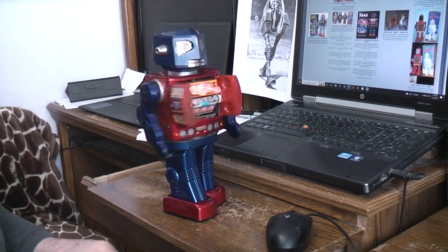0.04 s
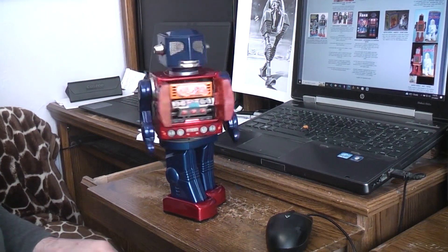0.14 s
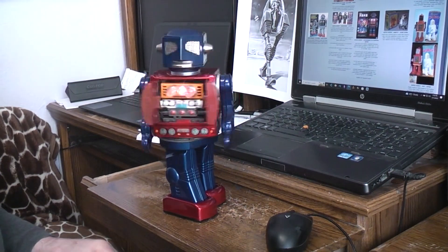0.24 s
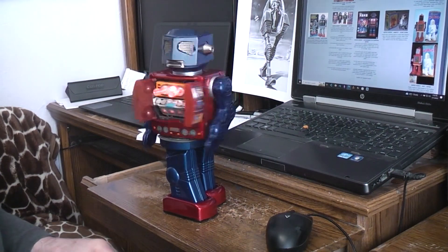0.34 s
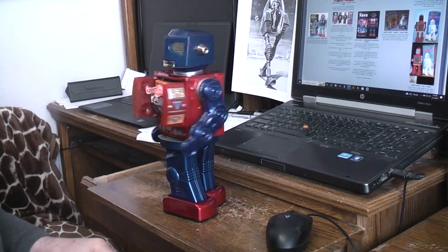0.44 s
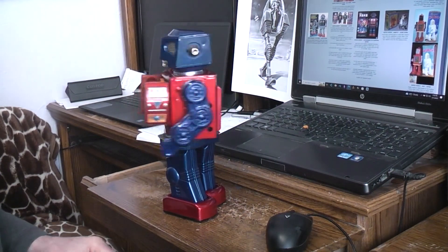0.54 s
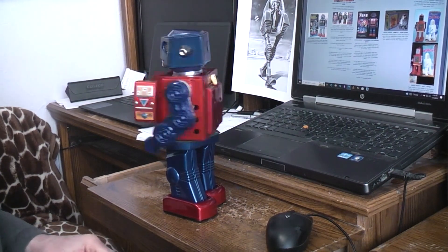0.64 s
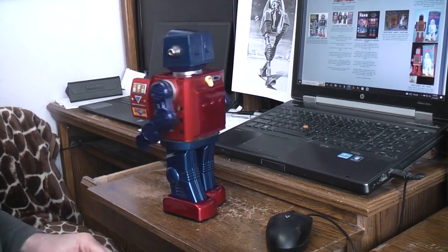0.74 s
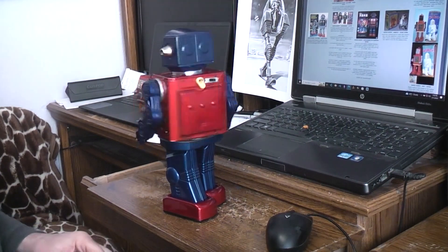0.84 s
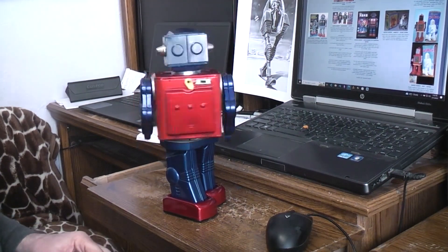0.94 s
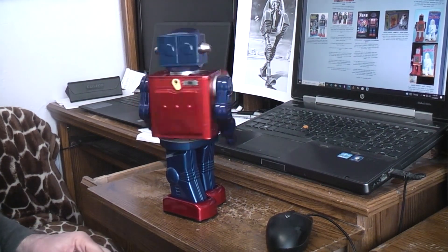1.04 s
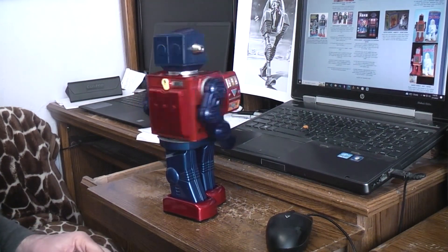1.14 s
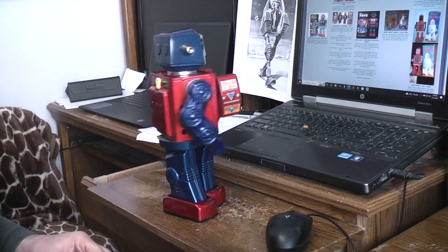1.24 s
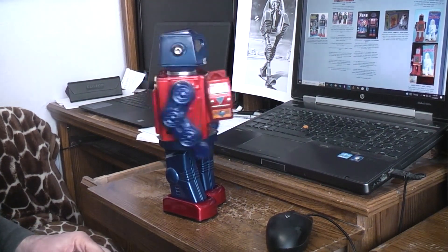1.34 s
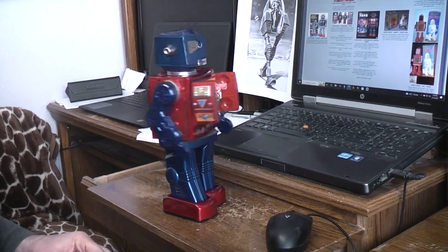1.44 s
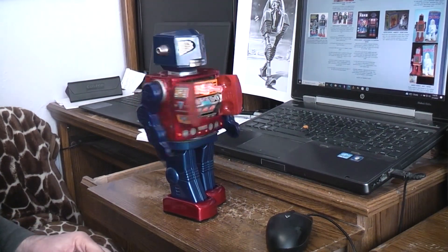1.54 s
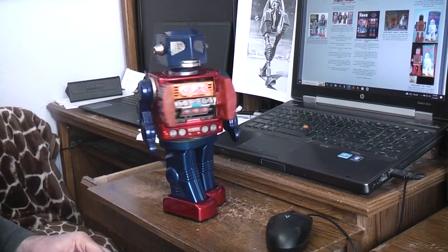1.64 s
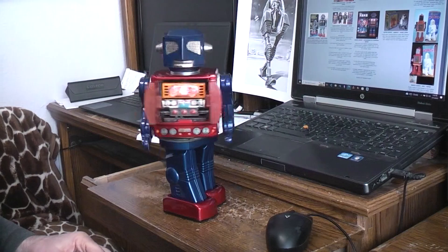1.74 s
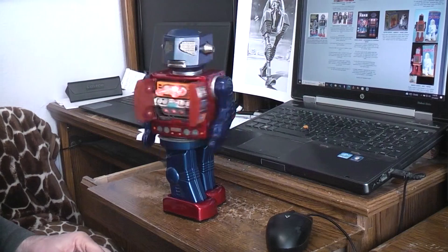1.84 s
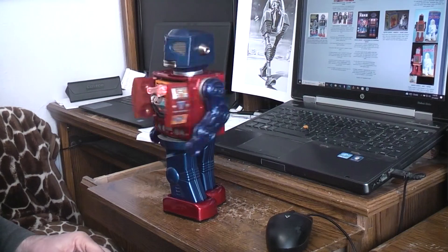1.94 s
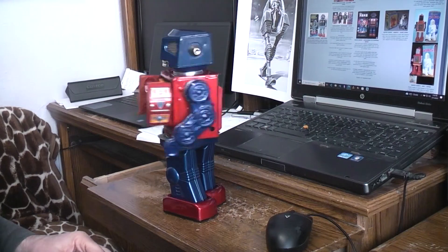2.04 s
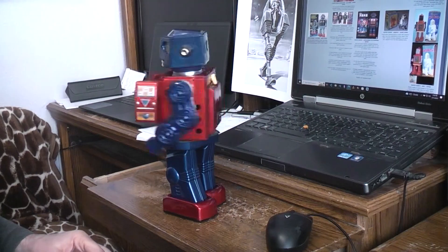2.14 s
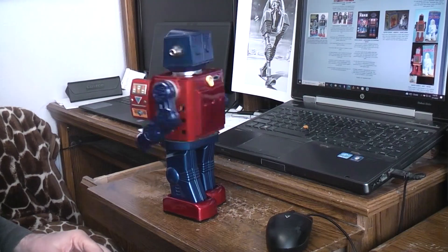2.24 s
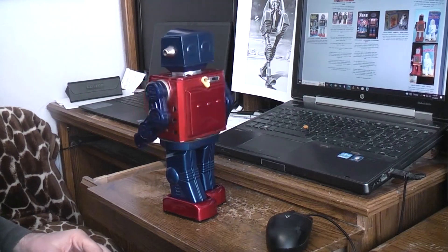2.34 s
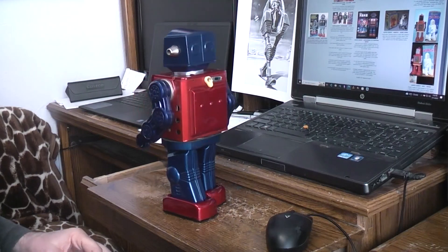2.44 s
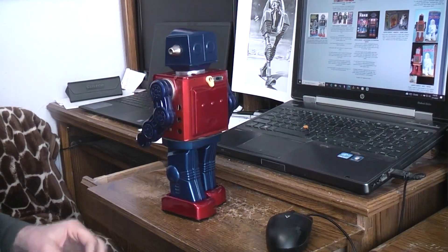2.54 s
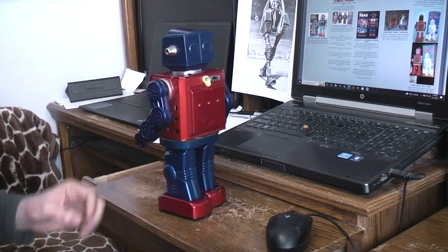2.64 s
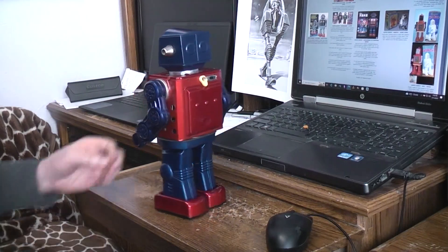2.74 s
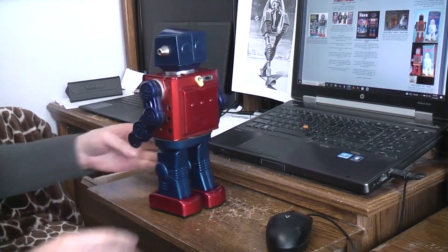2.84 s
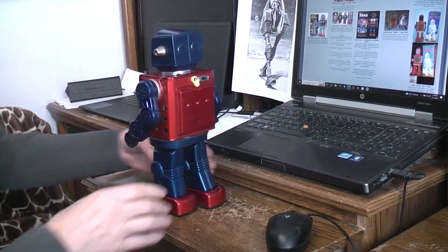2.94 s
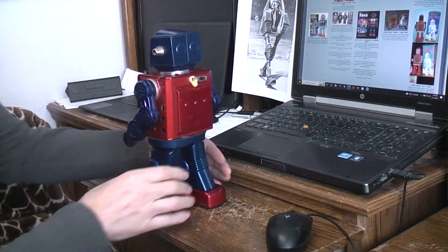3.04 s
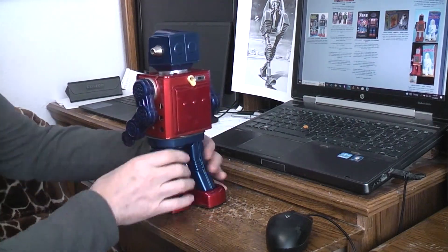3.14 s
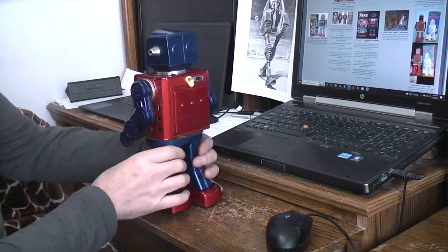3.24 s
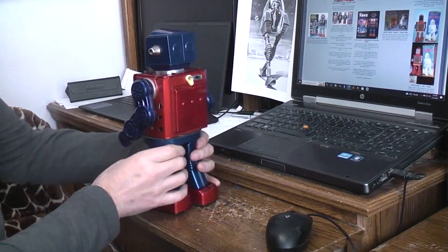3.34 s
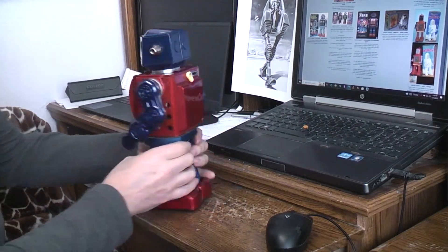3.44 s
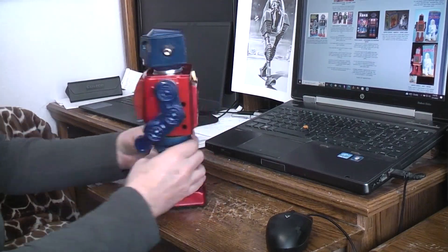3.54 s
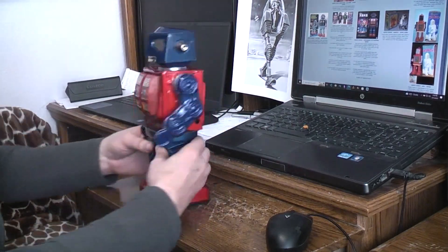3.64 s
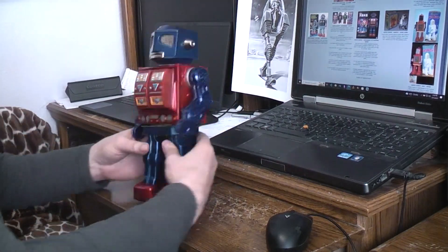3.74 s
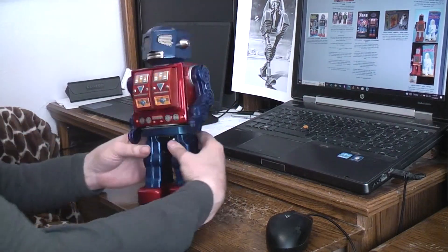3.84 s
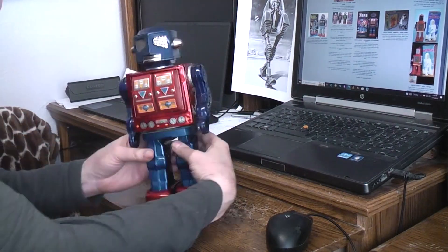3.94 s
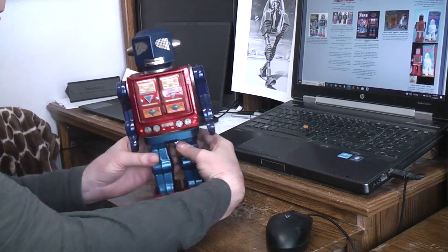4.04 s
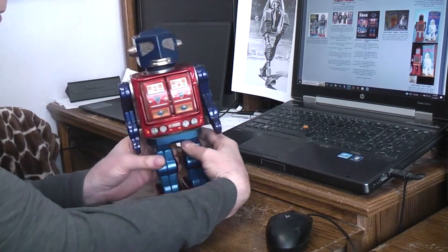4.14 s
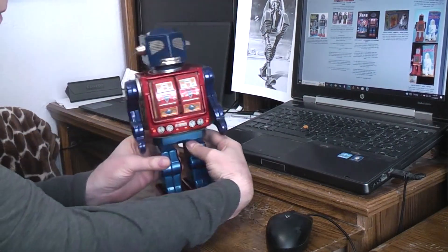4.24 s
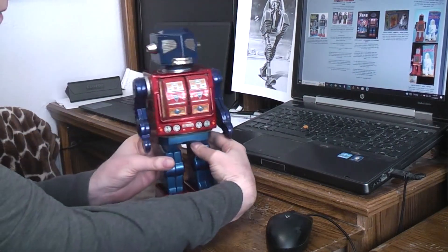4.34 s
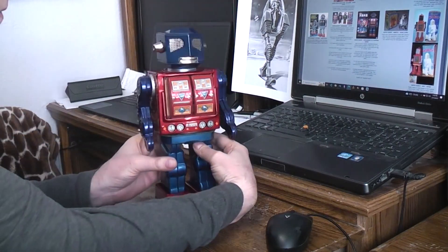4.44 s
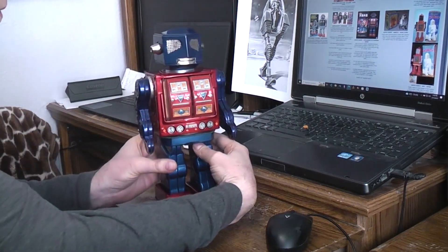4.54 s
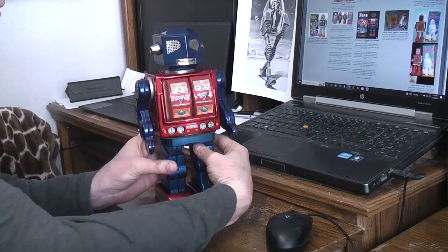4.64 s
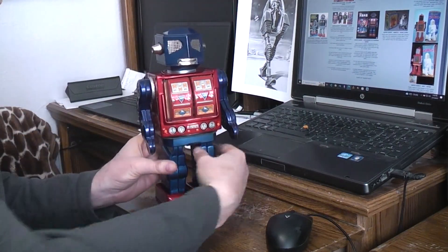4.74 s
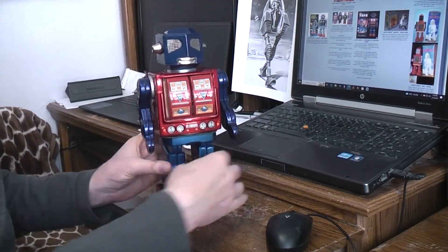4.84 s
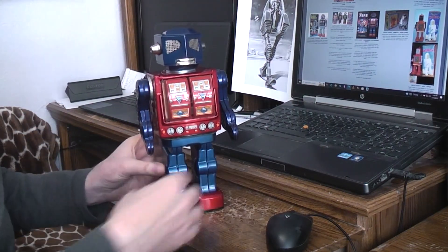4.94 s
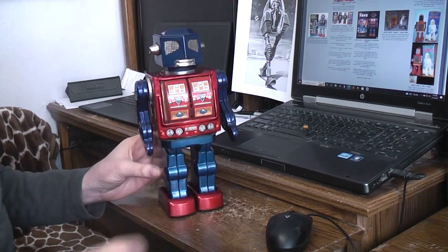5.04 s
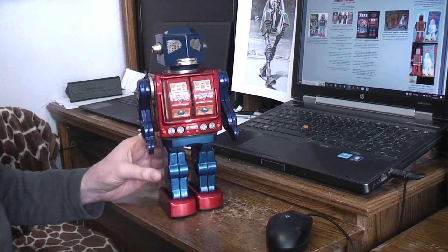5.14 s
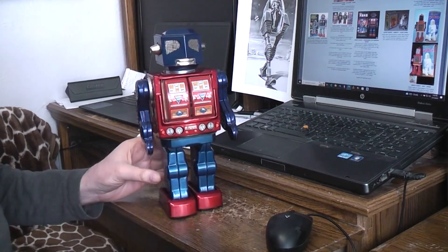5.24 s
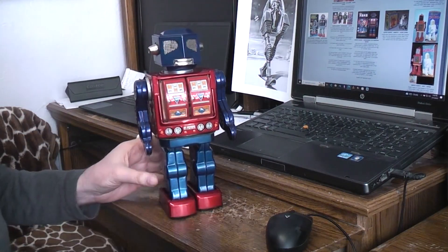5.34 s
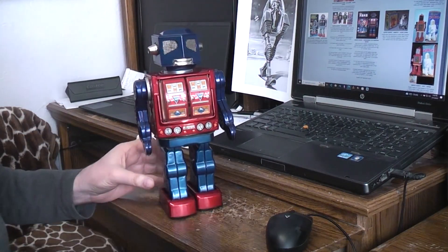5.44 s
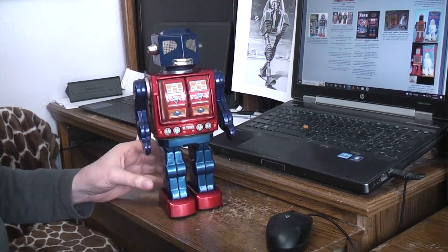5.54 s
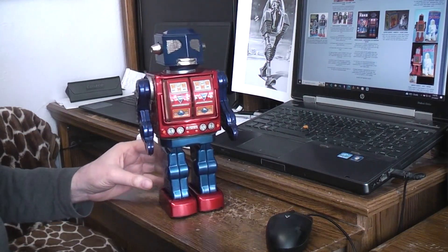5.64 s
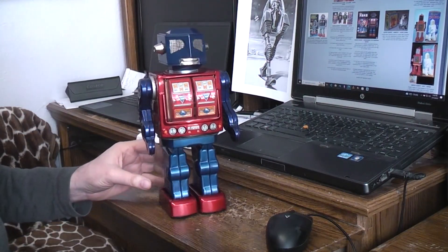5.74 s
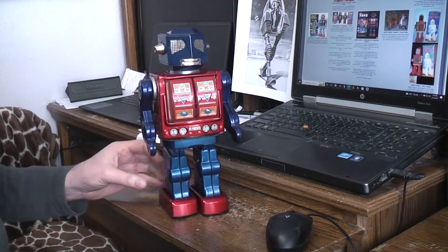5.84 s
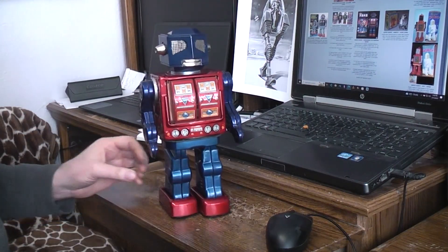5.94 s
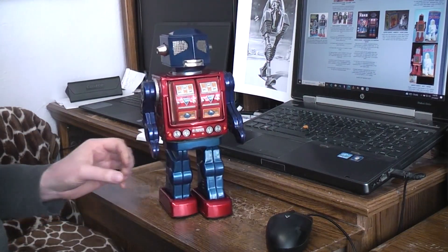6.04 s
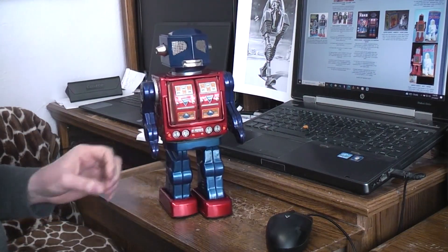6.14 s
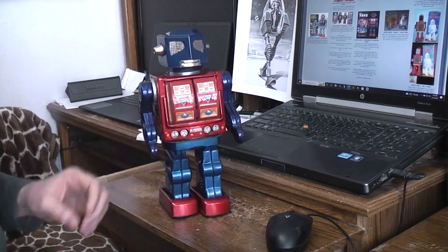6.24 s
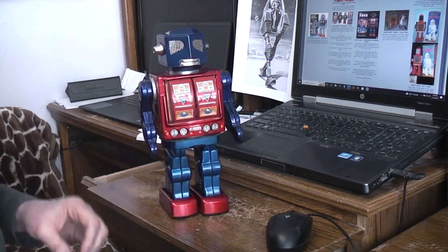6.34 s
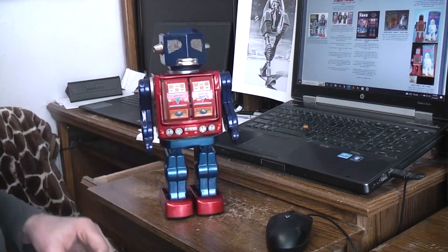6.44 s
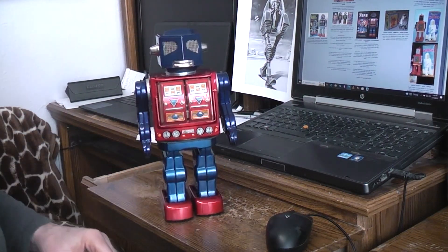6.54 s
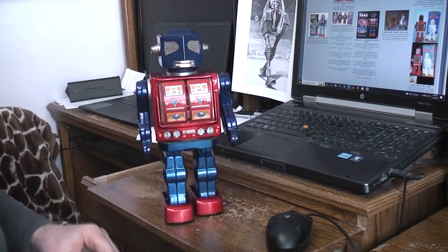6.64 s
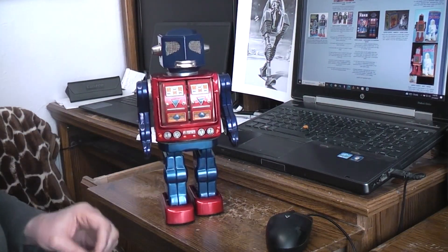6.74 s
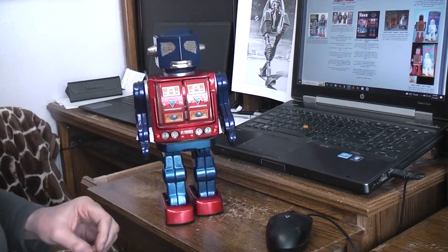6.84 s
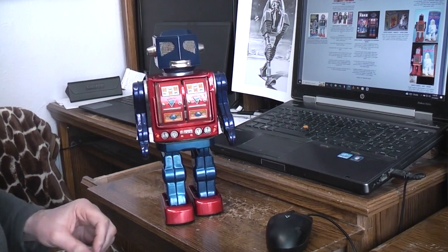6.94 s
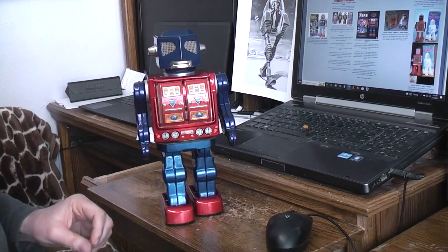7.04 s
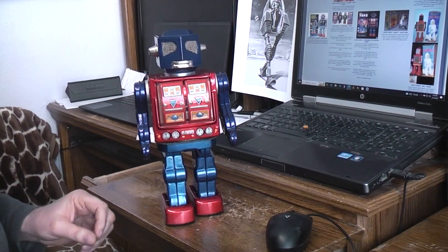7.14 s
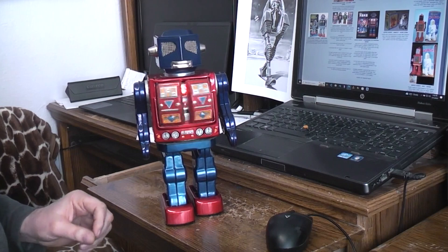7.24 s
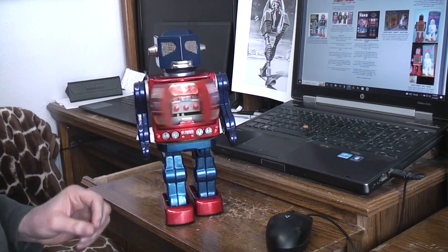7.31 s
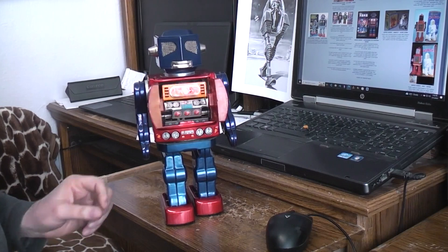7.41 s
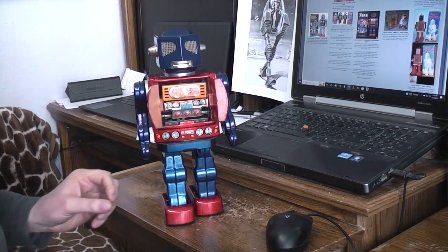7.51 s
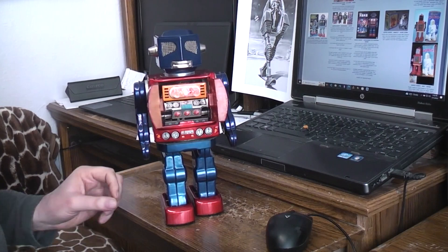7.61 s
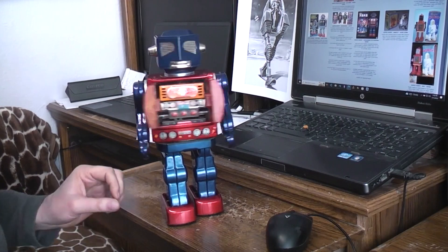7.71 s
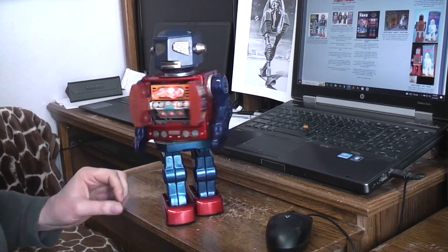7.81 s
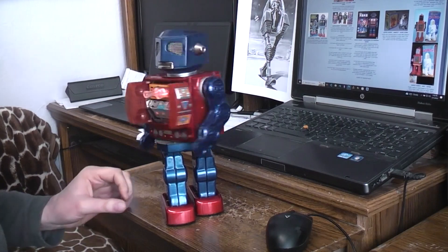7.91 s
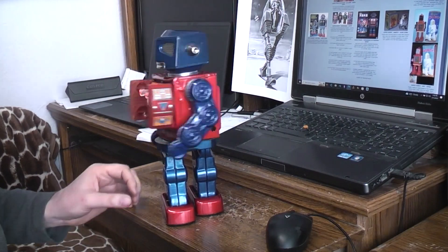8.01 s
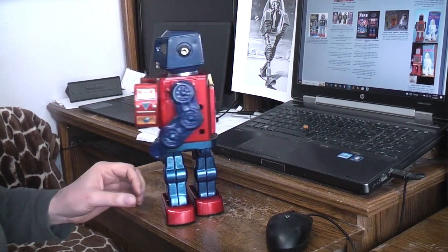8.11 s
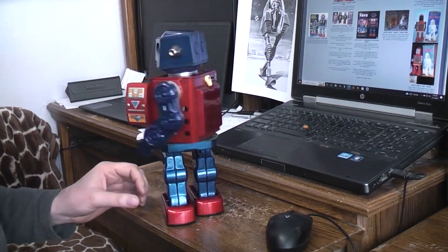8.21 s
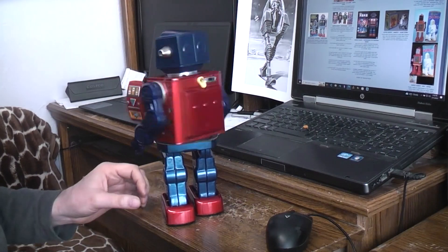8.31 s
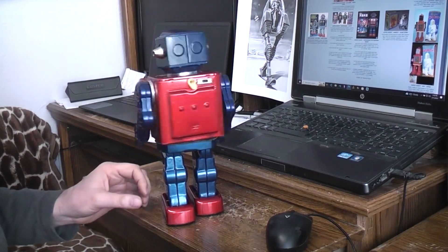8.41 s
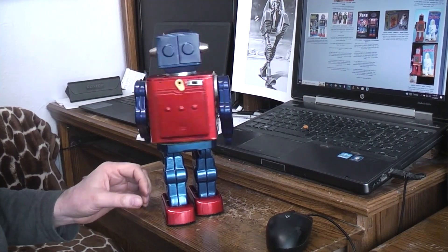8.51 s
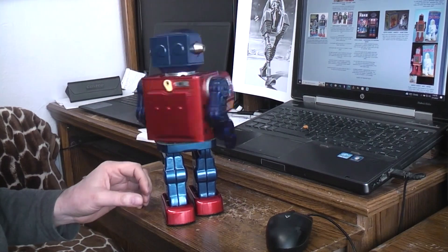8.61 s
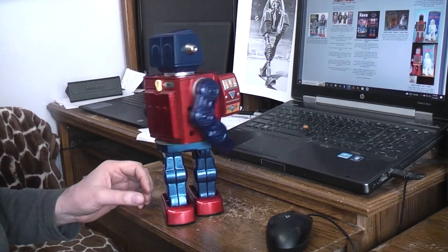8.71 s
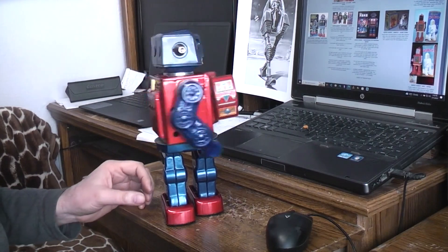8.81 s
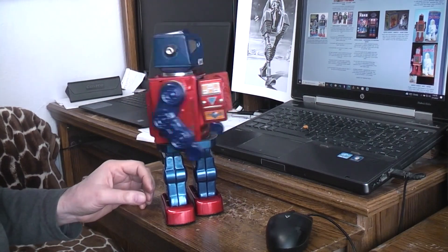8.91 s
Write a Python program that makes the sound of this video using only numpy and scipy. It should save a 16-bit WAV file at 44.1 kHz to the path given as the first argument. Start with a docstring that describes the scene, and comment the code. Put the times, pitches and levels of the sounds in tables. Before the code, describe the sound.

A tin toy robot clacks rapidly, drops to a buzzing motor and gear chatter as it walks, then starts clacking again.

```python
"""The clacker of a tin toy robot, on a wooden desk in a small room. While the chest spins, a cam strikes
the tin thirteen times a second; each impact excites damped modes, and the room answers with echoes.
Between the two spins the robot walks, its feet knocking on the desk. Throughout, the motor hums and the
gears chatter and whine over a low rumble. An automatic gain control ducks after the loud clacks and
creeps back up when they stop."""
import sys
import numpy as np
from scipy import signal
from scipy.fft import rfft, irfft, next_fast_len
from scipy.io import wavfile

SR = 44100
rng = np.random.default_rng(int(sys.argv[2]) if len(sys.argv) > 2 else 0)


def generate_wav(sig):
    """Save sig (samples, or channels by samples) to the path in sys.argv[1] as 16-bit PCM at SR."""
    pcm = np.round(np.clip(np.atleast_2d(sig).T, -1, 1) * 32767).astype(np.int16)
    wavfile.write(sys.argv[1], SR, pcm)


N = 395577
TIME = np.arange(N) / SR
CONTACT_S = .0007   # from first contact to the impulse

def amp(db):
    return 10 ** (np.asarray(db) / 20)

def unit_rms(x):
    return x / np.sqrt(np.mean(x ** 2) + 1e-20)

def in_time(rows):
    return np.interp(TIME, *np.transpose(rows))

def at_hz(rows, hz):
    row_hz, values = np.transpose(rows)
    return np.interp(np.log(hz), np.log(row_hz), values)

def drift(rate_hz):
    """Low-passed noise: a slow random fluctuation of unit RMS."""
    r = np.exp(-80 * np.pi * rate_hz / SR)
    slow = signal.lfilter([1], [1, -2 * r, r * r], rng.standard_normal(N // 40 + 2002))[2000:]
    return np.interp(np.arange(N) / 40, np.arange(len(slow)), unit_rms(slow))

def lag(x, seconds):
    """First-order relaxation with the given time constant."""
    r = np.exp(-1 / (seconds * SR))
    return signal.lfilter([1 - r], [1, -r], x, zi=[r * x[0]])[0]

def highpass(x, order, hz):
    return signal.sosfilt(signal.butter(order, hz, "high", fs=SR, output="sos"), x)

def impulses(rows, heights):
    """A brief impact acts as an impulse: one for each row's start time."""
    out = np.full(N, 1e-18)
    out[((np.array(rows)[:, 0] + CONTACT_S) * SR).astype(int)] = heights
    return out

def ring(force, hz, t60):
    """A damped mode: a unit impulse starts a decaying sine of height 1."""
    r, w = amp(-60 / (t60 * SR)), 2 * np.pi * hz / SR
    return signal.lfilter([0, np.sin(w)], [1, -2 * r * np.cos(w), r * r], force)

def resonate(x, peaks, lift_db, swell_db):
    """Resonance reinforces narrow bands of x, each swelling and fading independently."""
    out = x.copy()
    for hz, width, db in peaks:
        r = np.exp(-np.pi * width / SR)
        poles = [1, -2 * r * np.cos(2 * np.pi * hz / SR), r * r]
        band = signal.lfilter([(1 - r * r) / 2, 0, (r * r - 1) / 2], poles, x)
        out += amp(db + lift_db + swell_db * drift(2.8)) * band
    return out

# Likeness of the two channels. Each row: frequency in Hz, left-right correlation.
COHERENCE = [(40, 0.097), (190, 0.8), (1000, 0.86), (4000, 0.76), (8000, 0.75), (14000, 0.77)]
# Stereo balance. Each row: frequency in Hz, left minus right in dB.
BALANCE = [(40, -12), (150, -0.5), (1000, -1), (8000, -0.5)]

def coloured(source, spectrum, flicker_db, band_db=lambda hz: 0):
    """Partial coherence: a filtered mid and side pair mixes to stereo in flickering half-octave bands."""
    size = next_fast_len(N)
    bin_hz = np.arange(size // 2 + 1) * SR / size + 1
    shaped = rfft(source, size) * amp(at_hz(spectrum, bin_hz))
    out = 0
    for octave in np.arange(np.log2(spectrum[0][0]), np.log2(spectrum[-1][0]) + .5, .5):
        hz = 2 ** octave
        window = np.clip(1 - 2 * np.abs(np.log2(bin_hz) - octave), 0, 1)
        mid, side = irfft(shaped * window, size)[:, :N]
        alike = at_hz(COHERENCE, hz)
        gain = amp(band_db(hz) + flicker_db * drift(5.7))
        pan = amp(at_hz(BALANCE, hz) * np.array([[.5], [-.5]]))
        out += gain * pan * (np.sqrt(1 + alike) * mid + np.sqrt(1 - alike) * side * [[1], [-1]])
    return out

# Rumble of desk and room. Each row: frequency in Hz, relative spectral density in dB.
RUMBLE = [(12, -30), (25, -27), (60, 12), (120, 10.5), (200, 29.5), (300, 13), (500, 6), (800, -40)]

def room_rumble():
    """Filtered noise: the low background of desk and room, strongest near 200 Hz."""
    return amp(-55) * unit_rms(coloured(rng.standard_normal((2, N)), RUMBLE, flicker_db=2.0))

# Motor speed. Each row: time in seconds, beat frequency in Hz.
MOTOR_SPEED = [(0, 190.5), (3.4, 191.3), (6.2, 191), (6.6, 188), (6.9, 191)]

def motor_phase():
    """Phase, in cycles, is the integral of the motor's slightly wavering frequency."""
    return np.cumsum(in_time(MOTOR_SPEED) + .6 * drift(12)) / SR

def swell(middle_s, length_s, exponent):
    """An arch from 0 to 1 and back; a higher exponent flattens its top."""
    return np.clip(1 - (2 * (TIME - middle_s) / length_s) ** exponent, 0, 1)

# Motor harmonics. Each row: harmonic number, level in dB.
HARMONICS = [(2, -60), (3, -51.5), (4, -59), (6, -56), (7, -45), (8, -54.5)]
# A harmonic sings out. Each row: harmonic number, middle in seconds, length in seconds, boost in dB.
HARMONIC_SWELLS = [(8, 3.96, .15, 7), (8, 7.3, .3, 11), (8, 6.38, 0.36, 16), (7, 4.5, 0.66, 1),
                   (7, 5.9, 1.0, 8), (6, 2.9, 0.96, 13.5), (6, 4.6, .35, 11), (6, 6.5, .5, 12),
                   (4, 4.1, 0.6, 13), (4, 5.4, .4, 12), (4, 6, .5, 13)]
# The fundamental, carried by the desk. Each row: time in seconds, level in dB.
DESK_HUM = [(0, -89), (.6, -58), (1.8, -61), (2.45, -57), (2.7, -54.5), (3.05, -43.5), (3.4, -55.5),
            (4.1, -61), (4.6, -54), (5.45, -48.5), (5.75, -56.5), (6.0, -49), (6.88, -51), (6.97, -55),
            (7.8, -65), (8.97, -51)]
# The tones recede while the legs stand still. Each row: time in seconds, amplitude factor.
TONE_CLARITY = [(2.3, 0.57), (2.7, 1), (6.9, 0.71), (6.95, 0.35)]

def motor_hum(phase, load_db):
    """Periodic motion gives a harmonic series; a slower shaft beats against the fundamental."""
    shaft_hz, shaft_db = 175, -9.5
    shaft = amp(shaft_db) * np.sin(2 * np.pi * shaft_hz * TIME + .5 * drift(3.9))
    low = np.sin(2 * np.pi * phase) + shaft
    unloading_db = load_db.mean() - load_db   # the hum swells as the gears are unloaded
    low_db = in_time(DESK_HUM) + .31 * unloading_db + 1.3 * drift(5)
    overtones = 0
    for number, db in HARMONICS:
        db += sum(boost * swell(s, length, 2) for k, s, length, boost in HARMONIC_SWELLS if k == number)
        flicker_db = .55 * min(number, 8) * drift(49) + .26 * drift(.77)
        overtones += amp(db + flicker_db) * np.sin(2 * np.pi * (number * phase + rng.random()))
    return np.sqrt(2) * (amp(low_db) * low + in_time(TONE_CLARITY) * overtones) * amp([[-.8], [.8]])

# Meshing gear pairs. Each row: frequency in Hz, level in dB.
MESH_TONES = [(113, -63), (745, -52), (3038, -48), (6155, -48), (7666, -47), (9765, -56), (10331, -53),
              (10460, -52), (10960, -51), (11700, -58), (12680, -61), (12880, -63), (13850, -64),
              (14280, -62), (14420, -63)]
# Brief gear squeals. Each row: frequency in Hz, middle in seconds, length in seconds, level in dB.
SQUEALS = [(2891, 3.0, .42, -34), (2885, 3.48, .16, -36), (2836, 4.55, .18, -35), (2890, 4.7, .16, -37),
           (2867, 5.1, .3, -37), (2880, 5.42, .3, -36)]

def gear_whine():
    """Periodic tooth contact gives thin tones that waver and fade; now and then a gear squeals."""
    warped_s = TIME + np.cumsum(.0012 * drift(2)) / SR
    tones = sum(amp(db + 5 * drift(4)) * np.sin(2 * np.pi * hz * warped_s + .7 * drift(15))
                for hz, db in MESH_TONES)
    waver = .4 * drift(20)
    squeals = sum(amp(db) * swell(s, length, 4) * np.sin(2 * np.pi * hz * TIME + waver)
                  for hz, s, length, db in SQUEALS)
    return in_time(TONE_CLARITY) ** 2 * tones + np.sqrt(2) * squeals

# Load on the gears. Each row: time in seconds, relative chatter level in dB.
GEAR_LOAD = [(0, -28), (1.2, -25), (2.35, -25), (2.49, -32), (2.7, -29.5), (2.83, -22.5), (3.1, -31.5),
             (3.27, -27), (3.57, -32.5), (3.71, -28), (3.85, -32), (3.98, -26.5), (4.09, -30), (4.16, -36),
             (4.29, -29), (4.42, -34), (4.5, -28), (4.67, -33), (4.84, -30), (5.5, -32.5), (5.66, -27),
             (6.1, -32.5), (6.25, -30.5), (6.9, -28), (7.8, -24), (8.3, -26), (8.97, -22.5)]
# Spectrum of the chatter. Each row: frequency in Hz, relative spectral density in dB.
CHATTER_SPECTRUM = [(150, -52), (250, -14), (458, -13.5), (563, -7.5), (624, -11.5), (755, -4.5),
                    (882, -3.5), (1310, 1), (2150, 1), (2550, -1), (2900, 2.5), (3890, 4.5), (6650, -1.5),
                    (7770, -1), (8620, -6.5), (10600, -9), (15500, -21)]
# Resonances of the body. Each row: frequency in Hz, bandwidth in Hz, gain in dB.
SHELL_RESONANCES = [(769, 26, -0.5), (1126, 50, 3), (1532, 39, 0.5), (2080, 220, -5), (3170, 200, -9),
                    (3795, 65, -2), (4040, 110, -7), (4660, 18, 0), (7670, 120, -4), (10100, 64, -2),
                    (14400, 250, -11)]
# Rasp near 4 kHz while walking. Each row: time in seconds, relative level in dB.
RASP = [(2.4, -37.5), (2.67, -32.5), (2.79, -26), (3.09, -37), (3.29, -26.5), (3.35, -37), (3.36, -32.5),
        (3.49, -34), (3.5, -36), (3.72, -32), (3.93, -36.5), (3.94, -34), (4.07, -34), (4.08, -31),
        (4.15, -36), (4.28, -31), (4.61, -31), (4.68, -37), (4.73, -32.5), (4.84, -28), (5.52, -34.5),
        (5.65, -28.5), (6.15, -34), (6.18, -36), (6.2, -30), (6.9, -31.5)]
# Treble scrape while walking. Each row: time in seconds, relative level in dB.
SCRAPE = [(2.4, -35), (2.49, -45), (2.83, -34.5), (3.13, -41), (3.21, -37), (3.63, -40.5), (3.67, -38.5),
          (4.23, -40.5), (4.27, -38.5), (4.61, -38.5), (4.63, -42.5), (4.83, -37.5), (5.24, -39),
          (5.28, -42.5), (5.71, -37), (6.18, -40.5), (6.21, -35.5), (6.9, -38.5)]

def gear_chatter(phase, load_db):
    """Shot noise: random tooth impacts, densest at one point of each motor beat, ring the body."""
    ticks_per_s = 5000 * (1 + .2 * np.cos(2 * np.pi * phase)) * amp(1.5 * drift(25))
    sizes = amp(.64 * np.minimum(rng.exponential(1, (2, N)), 5)) * rng.choice([-1, 1], (2, N))
    ticks = sizes * (rng.random((2, N)) < ticks_per_s / SR)
    swing_db = load_db - load_db.mean()
    standing = in_time(TONE_CLARITY) < .7
    low_share, high_share = .57, .92   # of the load swing; rasp and scrape have their own while walking
    low_db = (low_share - 1) * swing_db - 2.5 * standing
    rasp_db = np.where(standing, 0, lag(in_time(RASP), .0092) + 33 - swing_db)
    high_db = np.where(standing, (high_share - 1) * swing_db, lag(in_time(SCRAPE), .011) + 37.5 - swing_db)

    def band_db(hz):
        return (low_db * np.interp(hz, [1700, 2600], [1, 0])
                + rasp_db * np.interp(hz, [2210, 2850, 4180, 5400], [0, 1, 1, 0])
                + high_db * np.interp(hz, [5500, 7000], [0, 1]))

    shell = resonate(ticks, SHELL_RESONANCES, lift_db=-1.0, swell_db=1.5)
    chatter = coloured(shell, CHATTER_SPECTRUM, flicker_db=1.0, band_db=band_db)
    return amp(load_db + 6) * unit_rms(chatter)

# Modes of the desk. Each row: frequency in Hz, level in dB, 60 dB decay time in seconds.
DESK_MODES = [(130, 0, .013), (330, -6, .02)]
# Feet knocking on the desk. Each row: start in seconds, relative level in dB.
FOOTFALLS = [(3.163, -46), (3.44, -38), (3.587, -31), (3.834, -39), (4.067, -46), (4.423, -36),
             (4.913, -70), (5.458, -79), (5.845, -33), (6.294, -28)]
DOORS_OPEN_S = 6.91

def desk_thumps():
    """Structure-borne sound: feet and clacks drive the desk, the clacks hardest as the doors fly open."""
    since_open = np.array(CLACKS)[:, 0] - DOORS_OPEN_S
    jolt = (since_open >= 0) * amp(-18 - 30 * np.abs(since_open))   # fades 30 dB a second
    force = impulses(CLACKS, jolt + amp(-62)) + impulses(FOOTFALLS, amp(np.array(FOOTFALLS)[:, 1] - 6))
    thumps = sum(ring(amp(db) * lag(force, .00018), hz, t60) for hz, db, t60 in DESK_MODES)
    return highpass(thumps, 2, 95) * amp([[-2.5], [2.5]])

# Spectrum of the echoes. Each row: frequency in Hz, relative spectral density in dB.
ECHO_SPECTRUM = [(180, -67), (300, -56), (600, -22), (1030, -2.5), (1420, -18), (1590, -6), (1940, 12),
                 (3280, 12), (3630, 1.5), (7620, 8), (15500, -11.5)]
# Tin resonances in the echoes. Each row: frequency in Hz, bandwidth in Hz, gain in dB.
ECHO_RESONANCES = [(1078, 30, 17), (1386, 64, 28.5), (2150, 34, 9.5), (2247, 18, 3.5), (2610, 360, -5.5),
                   (3366, 50, 10), (4600, 610, 6), (5870, 52, 3)]

def room_echoes():
    """Reverberation: dense reflections from walls and desk build up after each blow and then decay."""
    delay, rise_s, t60 = int(.002 * SR), .009, .15
    _, bands_db, _, echo_db = directivity()
    energy = impulses(CLACKS, amp(2 * echo_db)) + impulses(RATTLES, amp(2 * np.array(RATTLES)[:, 2]))
    energy = np.r_[np.zeros(delay), energy[:-delay]]
    energy[0] = amp(2 * -18)   # earlier blows still sound
    power = lag(signal.lfilter([1], [1, -amp(-120 / (t60 * SR))], energy), rise_s)
    colour_db = .043 * (bands_db - bands_db.mean(axis=1, keepdims=True))   # a trace of each blow's timbre

    def band_db(hz):
        return np.interp(TIME, np.array(CLACKS)[:, 0], per_blow(colour_db, hz))

    diffuse = resonate(rng.standard_normal((2, N)), ECHO_RESONANCES, lift_db=.5, swell_db=1.2)
    return np.sqrt(power) * unit_rms(coloured(diffuse, ECHO_SPECTRUM, flicker_db=.5, band_db=band_db))

# Rotation of the chest. Each row: time in seconds, angle away from the listener in degrees.
CHEST_ANGLE = [(0, -66), (2.35, 505), (6.9, 360), (7.73, 360), (8.97, 658)]
# Directions of the radiation pattern. Each entry: chest angle in degrees.
PATTERN_DEG = [0, 35, 60, 95, 130, 180, 220, 270, 320]
# Bands of the radiation pattern. Each entry: frequency in Hz.
PATTERN_HZ = [1200, 1800, 2200, 2650, 3200, 4800, 7000, 12000]
# Radiation pattern. Each row, one per angle: levels in dB of the eight bands, the long ring, the echoes.
PATTERN_DB = [(-2, -1, 17, 14, -9.5, 3.5, 8.5, 0, -22.5, -15),
              (8, 0, -6, 1.5, -10, -3.5, -1, 0, -30, -15.5), (4, -6, -23, 15, 2, -2.5, 9.5, 2, -30, -12),
              (-9, -31, -17, 7, 2, -6, -3, -16, -39, -17.5), (11, 18, 4, 8, 8.5, -11, -10, -3, -53, -8),
              (4, 21, 5, 10, 1.5, -17, -9, -2, -25, -14.5), (7, 29, 9, 0, 9, -2, -1, 0, -33, -11),
              (-6, 8, 2, 17, -13, -4.5, -2, -2, -32, -15.5), (-18, -34, -12, 11, 3, -2, 9, 1, -31, -12)]
# Radiation of the knock. Each entry, one per angle: level in dB.
KNOCK_PATTERN_DB = [-9, -7.5, -10.5, -10.5, -4, -7, -9.5, -11, -11]
# The doors swinging open. Each entry: initial gain in dB, for the knock, then each PATTERN_DB column.
DOORS_DB = [8.5, -19, 0, 16, 11, 18.5, 2, -16, 2, 7, 7]

def directivity():
    """Radiation depends on chest angle: each blow's dB for the knock, bands, long ring and echoes."""
    starts, strength_db, _ = np.transpose(CLACKS)
    angle = np.interp(starts, *np.transpose(CHEST_ANGLE))
    facing_db = np.transpose([np.interp(angle, PATTERN_DEG, column, period=360)
                              for column in np.c_[KNOCK_PATTERN_DB, PATTERN_DB].T])
    since_open, settle_s = starts - DOORS_OPEN_S, .33
    door_swing = (since_open >= 0) * np.exp(-np.abs(since_open) / settle_s)
    db = strength_db[:, None] + facing_db + np.outer(door_swing, DOORS_DB)
    return db[:, 0], db[:, 1:-2], db[:, -2], db[:, -1]

def per_blow(bands_db, hz):
    """Each blow's level at one frequency, interpolated between the bands."""
    return np.array([np.interp(hz, PATTERN_HZ, row) for row in bands_db])

# Blows of the clacker. Each row: start in seconds, strength in dB, pitch of the knock in Hz.
CLACKS = [(0.057, 0.5, 2520.0), (0.132, -1, 2520.0), (0.2072, -0.5, 2520.0), (0.2827, 1, 2560.0),
          (0.358, 3.5, 2530), (0.4337, 3.5, 2540), (0.5088, -1, 2580), (0.584, 1.5, 2660),
          (0.6593, 6, 2150.0), (0.7331, 3, 2180), (0.808, -3, 2150), (0.8828, 1, 2170.0),
          (0.958, 3, 2190.0), (1.0325, 3.5, 2170.0), (1.1077, 2.5, 2150), (1.1824, 1, 2160.0),
          (1.258, 3, 2130), (1.3346, 3, 2800), (1.408, 4, 2740), (1.485, 1.5, 2780), (1.561, 1.5, 2000),
          (1.6347, 1, 2500.0), (1.709, 1.5, 2500.0), (1.7847, 1, 2500), (1.8594, 3, 2500), (1.935, 4, 2540),
          (2.01, 2, 2570.0), (2.084, 5, 2600), (2.158, 4.5, 2610.0), (2.2336, 2, 2140),
          (2.3077, -0.5, 2150.0), (6.9139, -7, 2380), (7.0578, -5.5, 2450), (7.1305, -4, 2380),
          (7.205, -2, 2390), (7.28, -2.5, 2450), (7.3566, -0.5, 2320), (7.4315, 0, 2460),
          (7.5048, -1.5, 2600), (7.5786, -1, 2520), (7.654, 0, 2420), (7.7268, -0.5, 2530),
          (7.8078, 1.5, 2520), (7.89, 4, 2550), (7.968, 1, 2560), (8.046, 1.5, 2800), (8.123, 5, 2890.0),
          (8.1977, 1.5, 3010.0), (8.2742, -3, 2140), (8.351, 0, 2160.0), (8.4279, 3, 2150.0),
          (8.5038, 3.5, 2150), (8.5794, 3, 2150), (8.656, 2.5, 2130.0), (8.7319, 5, 2160),
          (8.8086, 6, 2600), (8.8844, 6, 2610.0), (8.96, 4.5, 2600)]

def knock(levels_db, t60=.015):
    """A heavily damped oscillation: a hollow knock whose pitch shifts between blows as the chest turns."""
    out, t = np.zeros(N + SR), np.arange(SR // 20) / SR
    for (s, _, hz), db in zip(CLACKS, levels_db):
        start = int((s + CONTACT_S) * SR)
        out[start:start + len(t)] -= amp(db - 60 * t / t60) * np.sin(2 * np.pi * hz * t)
    return out[:N]

# Modes of the struck tin. Each row: frequency in Hz, level in dB, 60 dB decay time in seconds.
TIN_MODES = [(1140, -46, 0.059), (1490, -30, .025), (1870, -34, 0.016), (2190, -36, .1), (3200, -16, 0.038),
             (3830, -19, 0.0062), (4640, -12, 0.015), (4880, -11.5, 0.013), (5320, -21, 0.015),
             (6000, -23, .018), (7300, -15, 0.0069), (9300, -23, 0.0089), (11300, -30, 0.014),
             (13400, -24.5, 0.0043)]
# The tin's long ring. Each row: frequency in Hz, level in dB, 60 dB decay time in seconds.
LONG_RING = [(3222, 1.5, .36), (3268, 0.0, .3)]
# Loose parts knocking. Each row: start in seconds, strength in dB, echo level in dB.
RATTLES = [(2.378, -50, -29), (2.4276, -18, -21.5), (2.4754, -22, -33), (3.475, -63, -24),
           (3.936, -22, -28), (6.792, -3, -22), (7.479, -2, -15)]

def clacker():
    """Modal superposition: each blow of the clacker or a loose part sets the tin's damped modes ringing."""
    knock_db, bands_db, ring_db, _ = directivity()
    scatter_db = rng.normal(0, 1.2, (len(CLACKS), len(TIN_MODES)))
    rattles = impulses(RATTLES, amp(np.array(RATTLES)[:, 1]))
    tin = knock(knock_db)
    for hz, db, t60 in LONG_RING:
        tin += ring(impulses(CLACKS, amp(ring_db + db)), hz, t60)
    for (hz, db, t60), uneven_db in zip(TIN_MODES, scatter_db.T):
        strikes = impulses(CLACKS, amp(per_blow(bands_db, hz) + uneven_db))
        tin += ring(amp(db) * (strikes + rattles), hz, t60)
    return highpass(tin, 4, 850) * amp([[-.4], [.4]])   # the clacker carries nothing below about 850 Hz

def scene():
    """Linear superposition of all sources, in stereo; hum and chatter share one motor and one load."""
    load_db, phase = in_time(GEAR_LOAD), motor_phase()
    rumble = room_rumble()
    drive = gear_chatter(phase, load_db) + motor_hum(phase, load_db) + gear_whine()
    return rumble + drive + desk_thumps() + clacker() + room_echoes()

def record(dry):
    """Automatic gain control ducks quickly on peaks and slowly on their average; soft clip, low-pass."""
    threshold_db, release_db_per_s, cutoff_hz = -11, 140, 16050
    over_db = np.maximum(20 * np.log10(np.abs(dry).max(axis=0) + 1e-9) - threshold_db, 0)
    recovery_db = release_db_per_s * TIME
    held_db = np.maximum(np.maximum.accumulate(over_db + recovery_db) - recovery_db, 0)
    quick_db = lag(held_db, .007)
    slow_db = lag(np.r_[6.0, held_db[1:]], .97)   # starts already ducked
    levelled = dry * amp(-.35 * quick_db - .71 * slow_db)
    rounded = .93 * np.tanh(levelled / .9)
    return signal.sosfilt(signal.ellip(12, .5, 60, cutoff_hz, fs=SR, output="sos"), rounded)

dry = scene()
out = record(dry)
generate_wav(out)
```